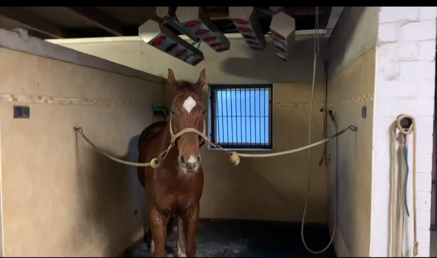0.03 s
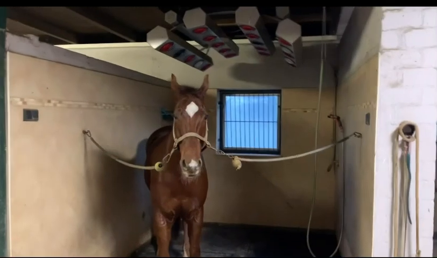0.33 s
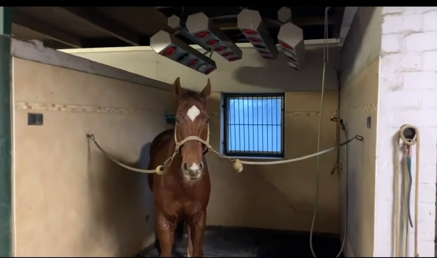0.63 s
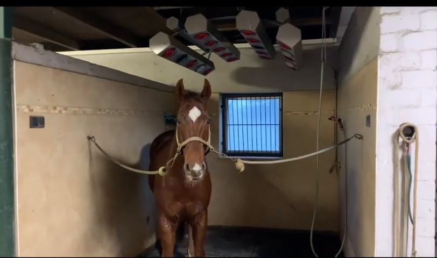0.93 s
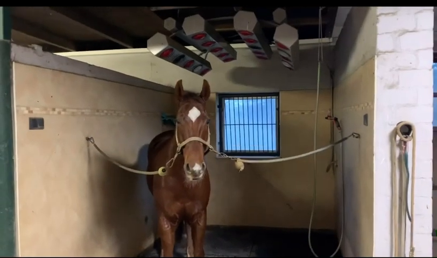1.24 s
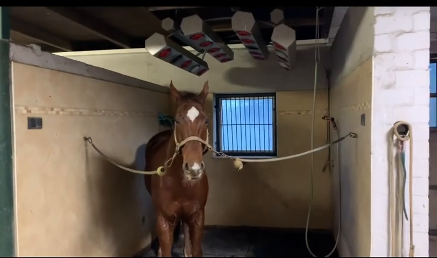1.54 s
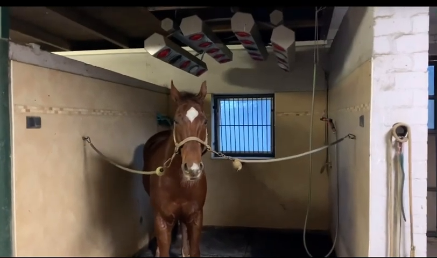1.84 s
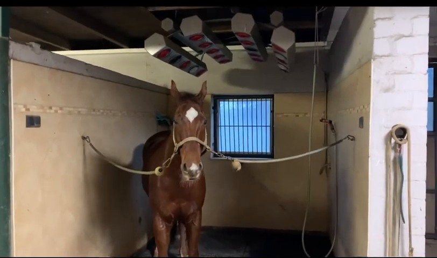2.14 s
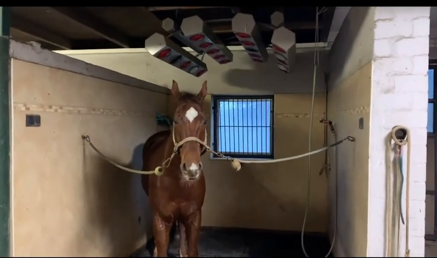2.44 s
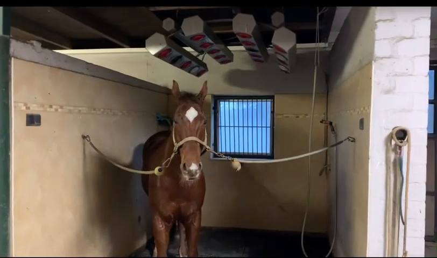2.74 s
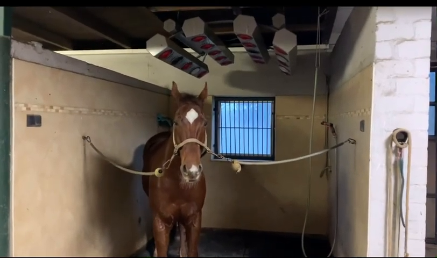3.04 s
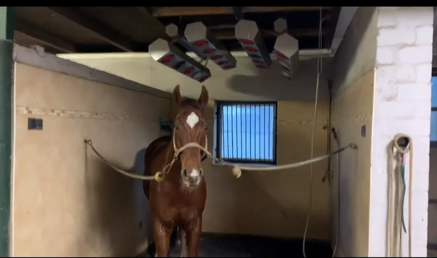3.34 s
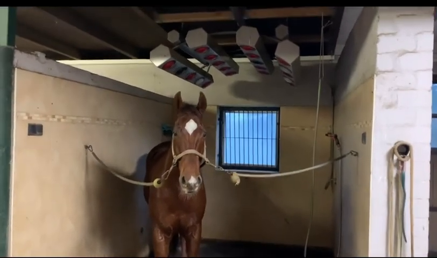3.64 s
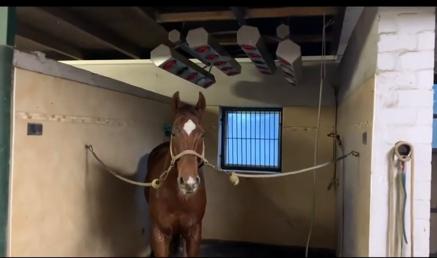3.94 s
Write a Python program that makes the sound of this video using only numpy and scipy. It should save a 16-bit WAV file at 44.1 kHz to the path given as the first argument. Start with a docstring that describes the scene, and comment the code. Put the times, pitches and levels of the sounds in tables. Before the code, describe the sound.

Small birds twitter with heavy echo in a barn, over some close rubbing and scuffing.

```python
"""Dull bumps boom in a masonry wash bay where a horse stands, and small birds twitter in the barn beyond,
heard almost wholly as echo over a low machine hum that swells briefly three times. Something rubs and
scuffs twice near the microphone, its many tiny slips merging into a rasp, with a few light taps and a
low rumble. Soft low thuds sound as the horse shifts its weight. A sharp tick, probably an electric
fence, repeats at an even pace."""
import sys
import numpy as np
from scipy import signal
from scipy.fft import rfft, irfft
from scipy.io import wavfile
from scipy.ndimage import uniform_filter1d

SR = 44100
rng = np.random.default_rng(int(sys.argv[2]) if len(sys.argv) > 2 else 0)


def materialize(psi):
    """Save the field psi as 16-bit PCM at rate SR to the path in sys.argv[1].

    A 1-D psi becomes a single channel; in a 2-D psi each row is a channel.
    """
    bounded = np.clip(np.atleast_2d(psi).T, -1, 1)
    quanta = np.round(bounded * 32767).astype(np.int16)
    wavfile.write(sys.argv[1], SR, quanta)


N = 176400


def undb(db):
    """Amplitude ratio of a level: tenfold for every 20 dB."""
    return 10 ** (np.asarray(db) / 20)


def unit(x):
    """Normalisation to an rms of 1."""
    return x / np.sqrt(np.mean(x ** 2) + 1e-24)


def clock():
    """Time of every sample in seconds."""
    return np.arange(N) / SR


def curve(rows):
    """Linear interpolation of (time_s, value) rows."""
    return np.interp(clock(), *np.array(rows).T)


def over_hz(points):
    """Interpolation of (freq_hz, value) rows on a log-frequency axis."""
    hz, value = np.array(points, float).T
    bins_hz = np.maximum(np.arange(N // 2 + 1) * SR / N, 1)
    return np.interp(np.log(bins_hz), np.log(hz), value)


def noise():
    """Two uncorrelated white noises."""
    return rng.standard_normal((2, N))


def colour(pair, spectrum):
    """Diffuse field of a given spectrum, at rms 1: the channels are alike in the bass, apart above."""
    # coherence of left and right: freq_hz, correlation
    coherence = [(30, .995), (125, 1), (280, 1), (500, 0.63), (1000, 0.22), (2000, 0.0096), (4000, -0.61),
                 (6700, 0.19), (9000, -0.65), (15200, 0.4)]
    alike = np.clip(over_hz(coherence), -.999, .999)
    mid, side = rfft(pair) * undb(over_hz(spectrum))
    mid, side = mid * np.sqrt(1 + alike), side * np.sqrt(1 - alike)
    return unit(irfft(np.array([mid + side, mid - side]), N))


def decay(start, attack, t60):
    """Damping envelope: a linear rise and an exponential fall of 60 dB in t60 seconds."""
    age = np.maximum(clock() - start, 0)
    return np.minimum(age / attack, 1) * np.exp(-np.log(1000) * age / t60)


def flutter(rate_hz, depth_db):
    """Random amplitude modulation: a gain that follows smoothed noise."""
    span = max(int(SR / rate_hz), 2)
    wander = uniform_filter1d(uniform_filter1d(rng.standard_normal(N), span), span)
    return undb(depth_db * unit(wander))


def walls(x):
    """Comb filtering: close reflections interfere with the direct sound."""
    # reflections from the near walls: delay_s, gain_db
    reflections = [(.0070, -18.5), (0.0111, -24), (0.0206, -15)]
    phase_per_s = -2j * np.pi * np.arange(N // 2 + 1) / N * SR
    response = 1 + sum(undb(db) * np.exp(phase_per_s * delay) for delay, db in reflections)
    return unit(irfft(rfft(x) * response, N))


def echo(x, t60):
    """Reverberation: convolution with decaying noise stands for countless reflections."""
    response = unit(noise() * decay(0, 0.002, t60)) / np.sqrt(N)
    return signal.fftconvolve(x[None], response, axes=1)[:, :N]


def barn_air(level_db=-60.5):
    """Ambient noise: the steady broadband background of the barn."""
    # spectrum of the still air: freq_hz, gain_db
    spectrum = [(20, 4), (40, -21), (70, 4), (130, -3), (250, -9), (500, -24), (1000, -24), (1700, -22.5),
                (4000, 1), (7000, -63), (11000, -24), (15500, -33.5)]
    return colour(noise(), spectrum) * undb(level_db)


def machine_hum():
    """Low machine resonances, each broadened by random frequency and amplitude modulation."""
    # resonances of the hum: pitch_hz, width_hz, level_db
    modes = [(59.3, 5.26, -68), (49.5, 11.4, -73), (86.2, 9, -71), (103.1, 8.6, -73.5)]
    out = 0
    for hz, width_hz, db in modes:
        drift_hz = unit(uniform_filter1d(rng.standard_normal(N), SR // 12)) * width_hz / 2
        cycles = hz * clock() + np.cumsum(drift_hz) / SR
        out += np.sqrt(2) * undb(db) * flutter(7.6, 2.8) * np.sin(2 * np.pi * cycles)
    return out


def microphone_rumble():
    """Handling noise: each port of the turning microphone rumbles independently."""
    # spectrum of the rumble: freq_hz, gain_db
    spectrum = [(25, -9), (60, -4), (130, -11), (300, -6), (600, -46)]
    # envelope of the rumble: time_s, level_db
    levels = [(3.0, -100), (3.12, -71), (3.3, -61), (3.5, -65), (3.7, -73), (3.85, -72), (4.0, -68)]
    return unit(irfft(rfft(noise()) * undb(over_hz(spectrum)), N)) * undb(curve(levels))


def bird_note(start, length, hz0, hz1, db, depth_hz, warble_hz=85.28, attack_s=.026, release_s=.006):
    """Frequency modulation: a whistle glides, warbles fast and wavers at random."""
    t = np.arange(int(length * SR)) / SR
    phase, pace = rng.random(2)
    warble = depth_hz * np.sin(2 * np.pi * (phase + warble_hz * (.7 + .6 * pace) * t))
    waver = (41.9 + depth_hz / 4) * np.interp(t, np.linspace(0, length, 16), rng.standard_normal(16))
    hz = hz0 + (hz1 - hz0) * t / length + warble + waver
    envelope = np.clip(np.minimum(t / attack_s, (length - t) / release_s), 0, 1)
    tone = np.sqrt(2) * undb(db) * envelope * np.sin(2 * np.pi * np.cumsum(hz) / SR)
    return np.pad(tone, (max(int(start * SR), 0), N))[:N]


def birds(notes_per_voice=64, flock_note_s=.06, crossover_hz=5570):
    """Reverberant field: hard walls wash out near notes and a farther flock; the treble dies sooner."""
    # near whistles: start_s, length_s, from_hz, to_hz, relative_db, warble_depth_hz
    notes = [(0.052, 0.084, 4070, 3690, -69, 610), (0.211, 0.046, 3680, 4140, -49, 410),
             (.27, 0.092, 3823, 3740, -45.5, 456), (0.289, 0.085, 4440, 4310, -48, 70),
             (0.419, 0.19, 4080, 3555, -57.5, 464), (0.676, 0.084, 3720, 3350, -55.5, 250),
             (0.772, 0.047, 4670, 4724, -49.5, 25), (0.778, 0.05, 4260, 4260, -50.5, 50),
             (0.853, 0.093, 3244, 3895, -46.5, 443), (.95, 0.11, 4530, 4280, -48, 352),
             (0.964, 0.12, 3456, 3394, -52, 256), (1.065, 0.073, 4420, 4314, -49, 151),
             (1.099, 0.12, 3600, 3900, -56.5, 557), (1.276, 0.04, 4590, 4220, -48.5, 307),
             (1.462, 0.079, 3300, 3670, -58, 197), (1.49, 0.16, 2964, 2650, -55.5, 607),
             (1.567, 0.077, 4630, 4340, -52, 202), (1.52, 0.079, 5780, 6000, -60.5, 620),
             (1.64, 0.08, 3147, 3337, -52, 148), (1.87, 0.069, 2760, 2550, -67, 253),
             (1.924, 0.072, 3350, 3516, -53.5, 250), (1.928, 0.079, 4230, 4530, -54, 352),
             (2.052, 0.06, 3276, 3153, -46, 78), (2.195, 0.07, 4530, 4440, -54, 101),
             (2.226, 0.063, 3100, 3350, -51, 129), (2.274, 0.15, 4130, 3200, -51, 644),
             (2.269, 0.086, 1980, 2295, -63, 200), (2.35, 0.066, 2884, 2780, -59, 200),
             (2.464, 0.075, 3160, 3260, -50.5, 120), (2.606, 0.11, 4420, 4300, -50, 380),
             (2.642, 0.085, 3410, 3736, -53.5, 385), (2.68, 0.07, 5700, 5630, -53.5, 353),
             (2.705, 0.051, 6190, 5950, -52, 110), (2.72, 0.053, 4183, 4140, -45.5, 40.5),
             (2.807, 0.065, 4400, 3876, -46, 324), (2.884, 0.075, 3257, 2915, -47, 398),
             (2.85, 0.2, 2250, 2052, -62, 305), (2.952, 0.061, 3303, 3586, -50, 473),
             (3.245, 0.055, 4810, 4810, -53, 79.4), (3.24, 0.095, 4350, 3900, -47, 410),
             (3.315, 0.093, 3654, 3200, -53, 397), (3.3, 0.069, 2756, 2550, -58, 251),
             (3.29, 0.061, 6240, 6000, -66, 510), (3.523, 0.078, 2507, 2688, -55.5, 300),
             (3.558, 0.11, 3080, 3325, -47.5, 380), (3.617, 0.091, 3800, 4702, -47.5, 447),
             (3.685, 0.097, 4760, 4340, -46, 398), (3.718, 0.14, 3224, 3720, -48.5, 453),
             (3.89, 0.098, 4360, 4100, -54.5, 392)]
    # voices of the farther flock: centre_hz, spread_hz, relative_db, warble_depth_hz
    voices = [(3640, 430, -51.5, 483), (4758, 250, -56.5, 335), (2760, 240, -67.5, 258)]
    song = sum(bird_note(*row) for row in notes)
    flock = 0
    for hz, spread_hz, db, depth_hz in voices:
        for k, (jitter, first, last) in enumerate(rng.standard_normal((notes_per_voice, 3))):
            start = (k - 1 + jitter / 2) / notes_per_voice * N / SR
            from_hz, to_hz = hz + spread_hz * first, hz + spread_hz * last
            flock += bird_note(start, flock_note_s, from_hz, to_hz, db, depth_hz)
    chorus = song + flock
    low = signal.sosfiltfilt(signal.butter(6, crossover_hz, fs=SR, output="sos"), chorus)
    tail = echo(low, t60=1) + echo(chorus - low, t60=0.73)
    early = undb(-10) * echo(song, t60=0.056)
    direct = undb(-8.5) * song
    return (tail + early + direct) * undb([[0.775], [0.225]])  # slightly to the left


def fence_ticks(first_s=1.213, period_s=1.32, attack_s=.007):
    """Periodic impulses: each spark gives a short snap and a longer bright echo."""
    # spectrum of the echo: freq_hz, gain_db
    ring_spectrum = [(1500, -64), (3500, -35), (5200, 2.5), (6300, 6), (7200, -1), (8500, -40.5),
                     (12000, -32)]
    # spectrum of the snap: freq_hz, gain_db
    snap_spectrum = [(1500, -35), (5000, -25), (7500, -21), (10500, 6), (12500, 3), (15500, -6)]
    starts = first_s + period_s * np.arange(3)
    ring = colour(noise(), ring_spectrum) * sum(decay(s, attack_s, t60=0.59) for s in starts)
    snap = colour(noise(), snap_spectrum) * sum(decay(s, attack_s, t60=0.38) for s in starts)
    return ring * undb(-51) + snap * undb(-60.5)


def grains(slips_per_s=2500, spread_db=3.5, smear_s=0.0055):
    """Stick-slip friction: dense tiny slips of uneven size add in energy."""
    slips = rng.random(N) < slips_per_s / SR
    size = undb(spread_db * np.minimum(rng.exponential(size=N), 4))
    smear = np.exp(-np.arange(N // 100) / SR / smear_s)
    energy = np.abs(signal.fftconvolve(slips * size ** 2, smear)[:N])
    return noise() * np.sqrt(energy)


def resonance(hz, width_hz):
    """Forced resonance: friction grains ring in one narrow band whose centre may move."""
    lowpass = signal.butter(2, width_hz / 2, fs=SR, output="sos")
    baseband = signal.sosfilt(lowpass, grains() + 1j * grains())
    carrier = np.exp(2j * np.pi * np.cumsum(hz * np.ones(N)) / SR)
    return colour(np.real(baseband * carrier), [(1, 0), (SR / 2, 0)])  # flat: stereo spread only


def thuds_and_hum_swells():
    """Damped bands of noise: soft low thuds, and three brief swells of the low hum."""
    # thuds and, at 80 Hz and below, hum swells: start_s, level_db, centre_hz
    pulses = [(.728, -51, 305), (.86, -58, 380), (1.19, -53.5, 223), (1.235, -52, 119), (1.41, -47, 80),
              (1.661, -56.5, 218), (1.815, -55, 62.5), (3.16, -50.5, 62.4), (3.258, -55, 273),
              (3.572, -58, 386), (3.943, -56, 425)]
    # spectrum of a thud or swell: multiple_of_centre, gain_db
    spectrum = [(.3, -30), (.75, -7), (1, 2), (1.3, -6), (2, -29), (5, -50)]
    out = 0
    for start, db, hz in pulses:
        ring = colour(noise(), [(hz * ratio, gain_db) for ratio, gain_db in spectrum])
        out += ring * undb(db) * decay(start, attack=0.015, t60=0.19)
    return out


def taps():
    """Heavily damped impacts: light taps die fast and leave a faint reverberation."""
    # light taps: start_s, level_db, centre_hz
    strikes = [(.416, -47, 1040), (3.09, -43.5, 1500), (3.159, -53.5, 760), (3.206, -49.5, 710),
               (3.264, -55, 610), (3.821, -56.5, 1560), (3.872, -52.5, 1380)]
    # spectrum of a tap: multiple_of_centre, gain_db
    spectrum = [(.25, -35), (.65, -15), (1, 9), (1.4, -4.5), (2.6, -39), (8, -58)]
    out = 0
    for start, db, hz in strikes:
        ring = colour(noise(), [(hz * ratio, gain_db) for ratio, gain_db in spectrum])
        direct = decay(start, attack=0.0015, t60=0.053)
        room = undb(-17.5) * decay(start, attack=0.0079, t60=0.63)
        out += ring * undb(db) * (direct + room)
    return out


def bumps():
    """Resonant decay: dull bumps boom in the bay, the pitch bending up and sinking back."""
    # dull bumps: start_s, relative_db
    blows = [(0.034, -46.5), (.068, -56.5), (.15, -58.5), (.215, -64)]
    # spectrum of a bump: freq_hz, gain_db
    spectrum = [(60, -45), (130, -6), (190, -6.5), (240, 2.5), (340, -3.5), (430, -2), (700, -25),
                (1500, -48)]
    # bend of the boom: time_s, pitch_hz
    bend = [(.04, 187.7), (.075, 316.4), (.13, 289.6), (.25, 235)]
    boom = colour(noise(), spectrum) + undb(-3.5) * resonance(curve(bend), width_hz=75)
    return boom * sum(undb(db) * decay(start, attack=0.019, t60=0.53) for start, db in blows)


def hollow_note(peak_s=0.867, width_s=0.099):
    """Friction drives a hollow resonance that dips and rises at the hardest push of the scuff."""
    # broad spectrum around the resonance: freq_hz, gain_db
    spectrum = [(500, -39), (760, -13), (1000, -2), (1150, 3), (1400, -6), (2200, -15.5)]
    # glide of the resonance: time_s, pitch_hz
    glide = [(.76, 1060), (.82, 1130), (.885, 920), (.94, 1060), (1.0, 1000)]
    push = np.exp(-((clock() - peak_s) / width_s) ** 2)
    broad = colour(walls(grains()), spectrum) * undb(-48)
    narrow = resonance(curve(glide), width_hz=156) * undb(-50)
    return (broad + narrow) * push


def rubbing():
    """Friction noise in two strokes: a low body, a rasp, a bristly top and narrow resonances."""
    # spectra of the body, rasp and top: freq_hz, gain_db
    body_spectrum = [(40, -27), (70, -9), (115, -3), (160, -7), (220, -0.5), (400, 1), (540, -0.5),
                     (680, -8.5), (1200, -34.5)]
    rasp_spectrum = [(100, -36), (400, -25), (660, -8), (850, -2.5), (1100, -4), (1400, -4), (1950, -4),
                     (2450, -11), (3300, -6), (4700, -6.5), (5600, -12.5), (7000, -17), (10000, -64)]
    top_spectrum = [(2500, -21), (5000, -28), (6800, 6.5), (8500, -5), (10500, 8), (12500, -8),
                    (15500, -8.5)]
    # envelopes of the body, rasp and top: time_s, relative_db
    body_levels = [(0.25, -59), (0.33, -60.5), (0.91, -48), (1.1, -56), (1.2, -54), (1.22, -57),
                   (1.37, -52.5), (1.5, -60.5), (1.54, -55), (1.98, -73), (3.01, -76), (3.12, -59),
                   (3.28, -56), (3.71, -72), (3.97, -70), (4.0, -77)]
    rasp_levels = [(0.04, -58), (0.09, -57.5), (0.25, -58.5), (0.61, -58), (0.92, -49.5), (0.97, -53),
                   (1.7, -68), (1.87, -82.5), (2.61, -73), (2.8, -82), (3.08, -71), (3.09, -65),
                   (3.14, -62.5), (3.36, -61.5), (3.61, -67.5), (3.73, -79.5), (3.87, -66), (4.0, -71.5)]
    top_levels = [(.04, -74), (.15, -70), (.42, -69.5), (.52, -71), (.74, -64.5), (.83, -57.5),
                  (.93, -54.5), (1.0, -55), (1.08, -74), (1.45, -85), (1.6, -80), (1.85, -87.5), (3.0, -87),
                  (3.32, -78.5), (3.6, -81), (3.75, -100)]
    # faint ring that lingers after the second rub: time_s, level_db
    ring_levels = [(3.45, -104), (3.58, -63.5), (3.68, -74), (3.77, -67), (3.85, -75), (4.0, -70)]
    body = colour(walls(grains()), body_spectrum) * undb(curve(body_levels) - 1)
    rasp = colour(walls(grains()), rasp_spectrum) * undb(curve(rasp_levels) + 5.5) * flutter(30, 1.2)
    hollow = hollow_note()
    top = colour(grains(), top_spectrum) * undb(curve(top_levels) + 6) * flutter(49, 0.43)
    ring = resonance(hz=500, width_hz=98) * undb(curve(ring_levels))
    return body + rasp + hollow + top + ring


def scene():
    """Superposition: the pressures of all the sources add."""
    return (birds() + rubbing() + microphone_rumble() + bumps() + taps() + thuds_and_hum_swells()
            + fence_ticks() + barn_air() + machine_hum())


def record(dry, start_s=.034, fade_s=0.059, cutoff_hz=15800):
    """Band limiting: the sound fades in and a steep low-pass filter cuts the top."""
    fade = np.clip((clock() - start_s) / fade_s, 0, 1)
    return signal.sosfilt(signal.ellip(10, .2, 80, cutoff_hz, fs=SR, output="sos"), dry * fade)


dry = scene()
out = record(dry)
materialize(out)
```